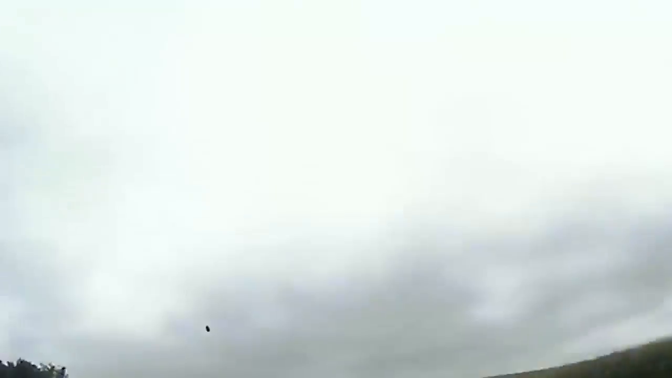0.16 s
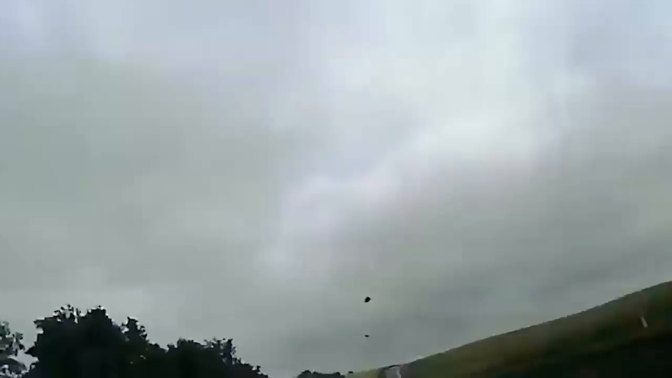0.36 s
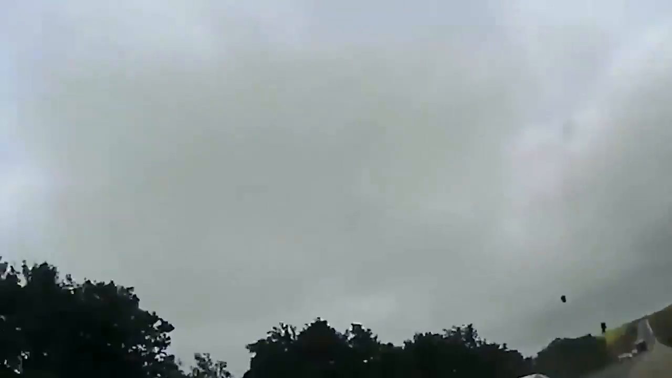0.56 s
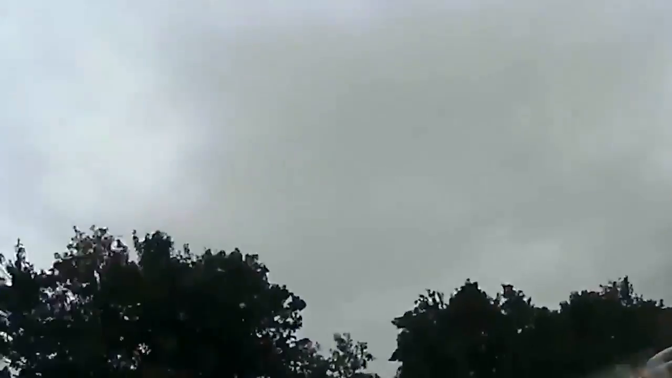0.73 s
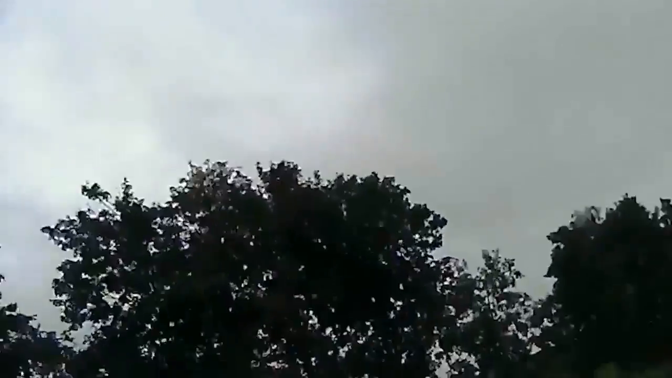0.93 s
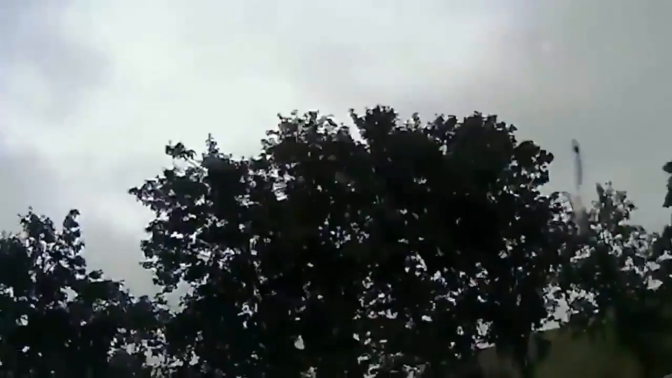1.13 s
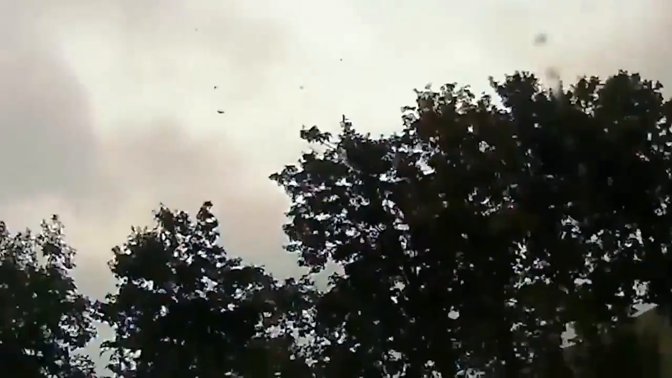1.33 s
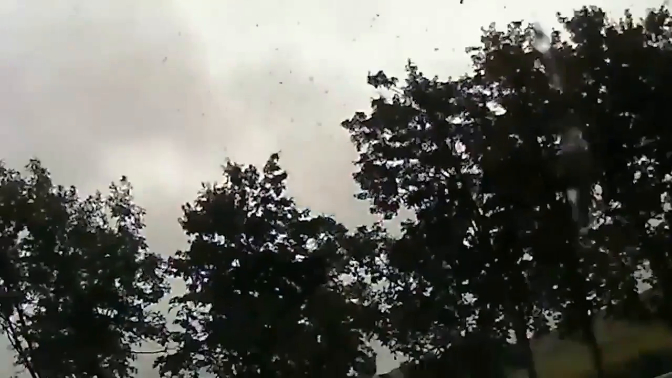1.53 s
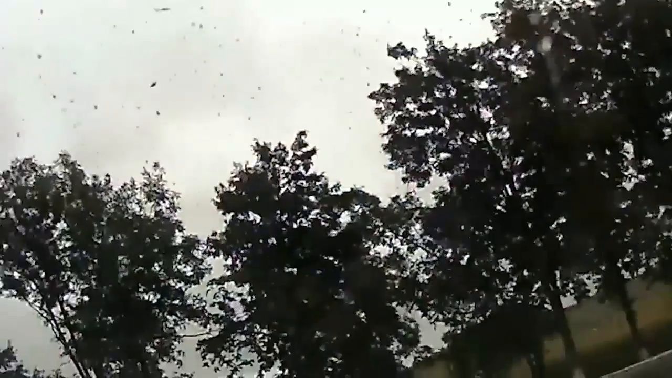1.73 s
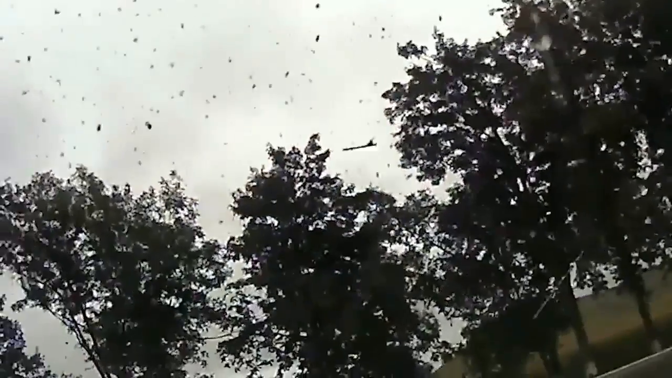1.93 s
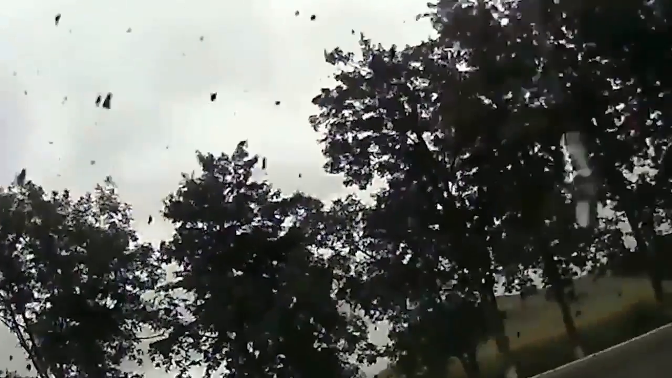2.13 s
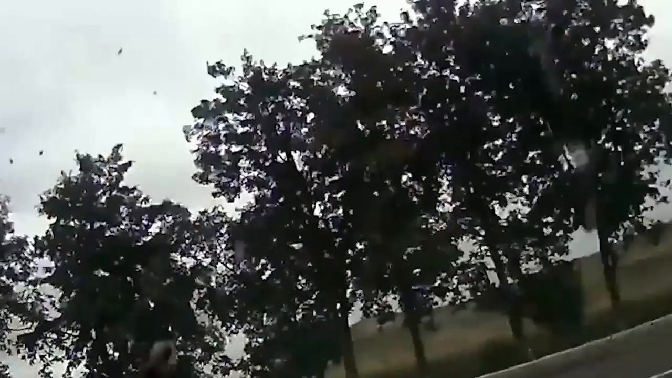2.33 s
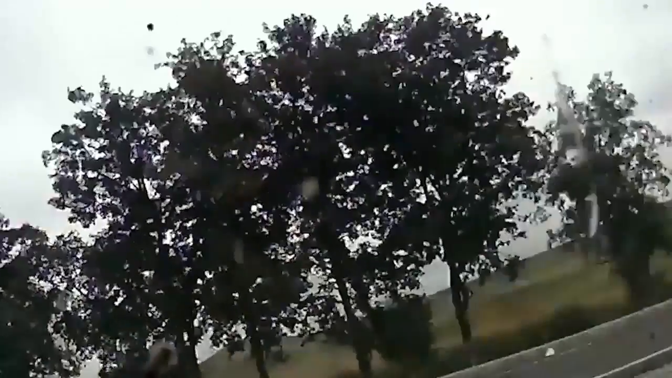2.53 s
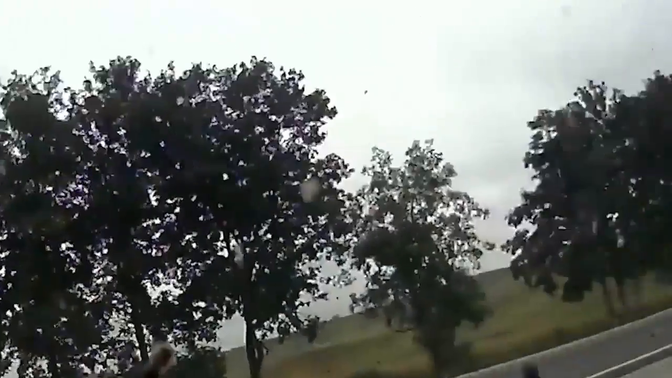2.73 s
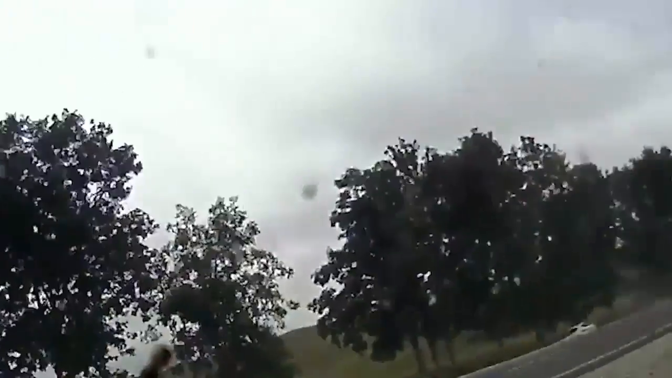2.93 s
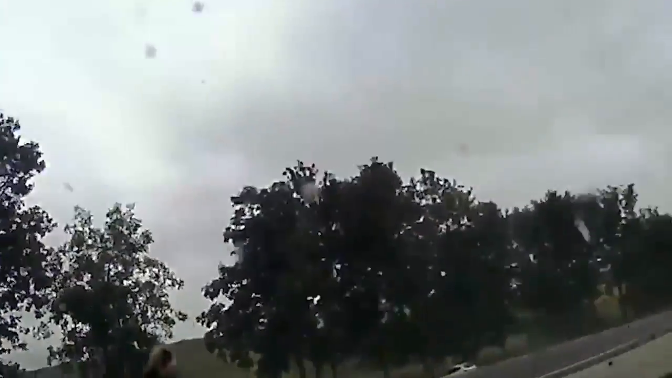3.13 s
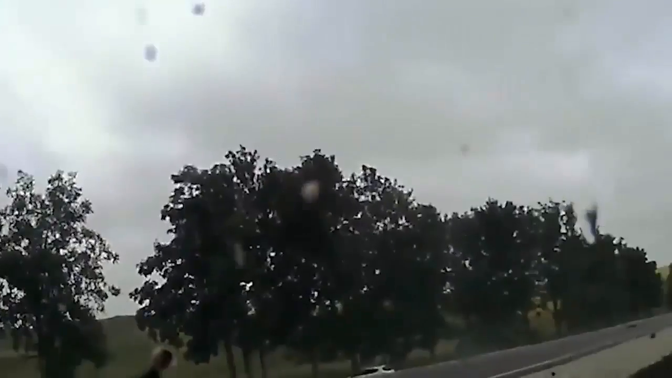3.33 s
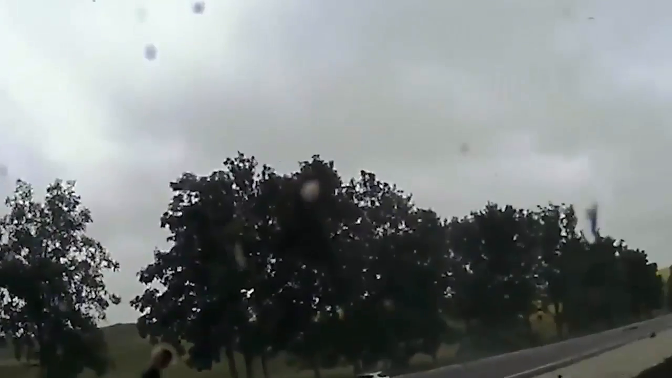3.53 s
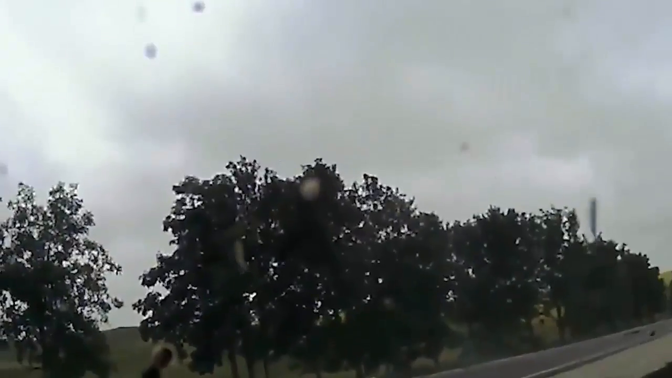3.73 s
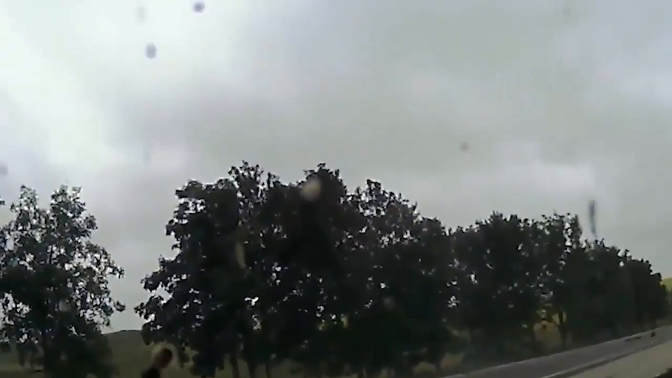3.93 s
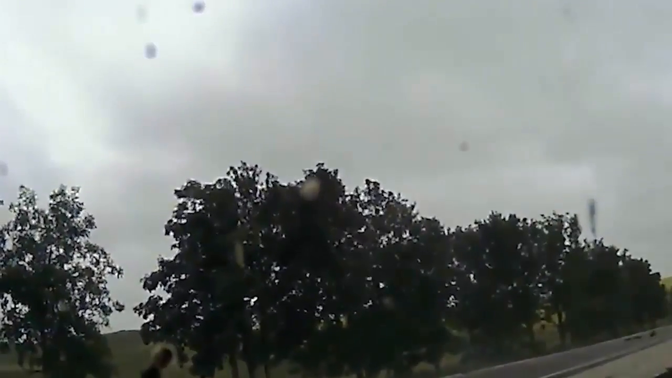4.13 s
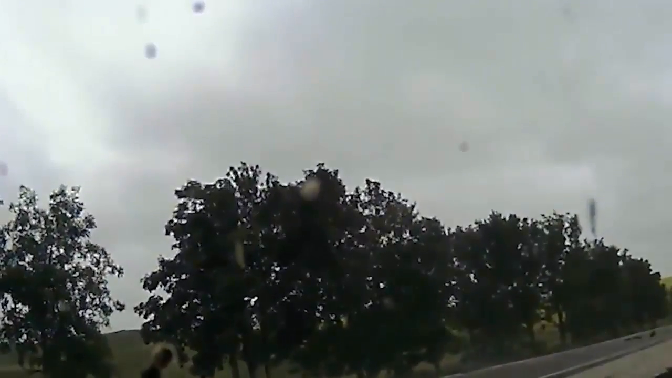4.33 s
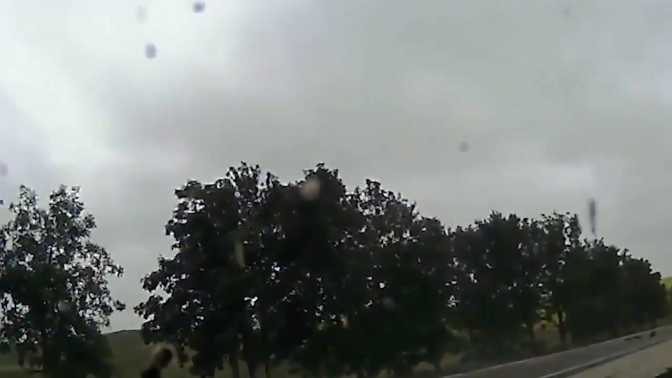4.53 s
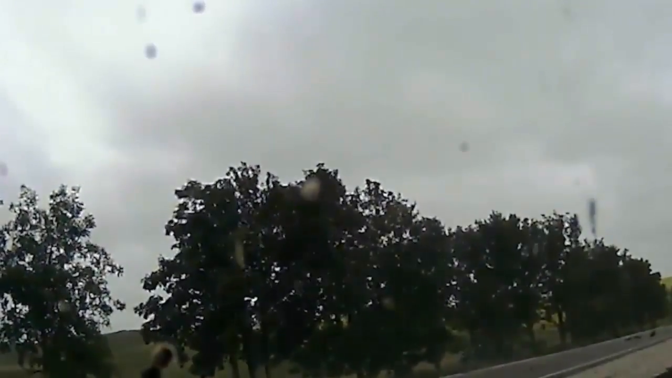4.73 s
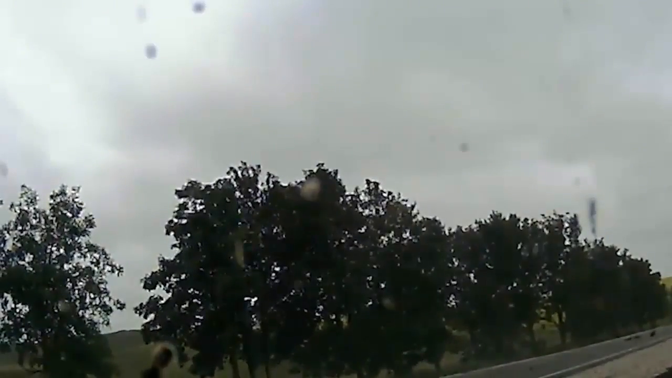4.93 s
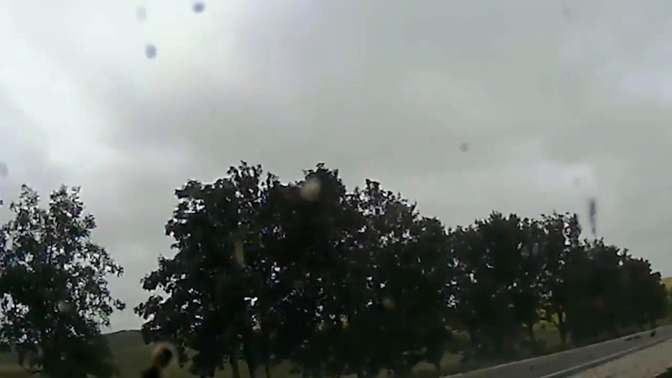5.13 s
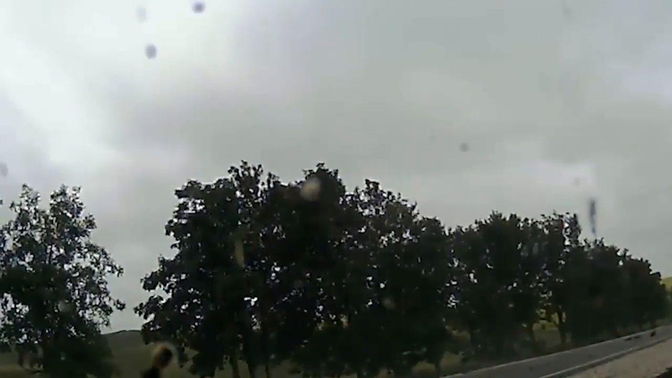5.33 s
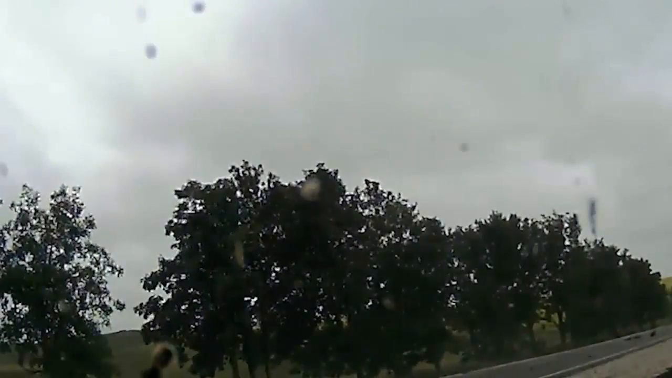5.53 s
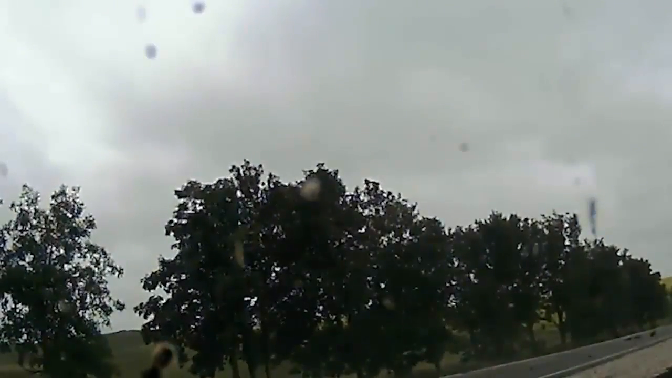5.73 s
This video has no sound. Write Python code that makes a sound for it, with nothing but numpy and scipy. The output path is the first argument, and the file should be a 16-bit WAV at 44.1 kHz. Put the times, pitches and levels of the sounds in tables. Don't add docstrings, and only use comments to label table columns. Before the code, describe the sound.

Heard from a microphone on a car's windscreen: a brief, fuzzy tyre squeal, then a massive impact that distorts the microphone. The shell crunches and scrapes over gravel, plastic snaps, panels bang and stones crack on glass. Over about two seconds it thins into separate knocks and rattles, then near quiet with small taps, faint brake squeaks and a low idling engine.

```python
import sys
import numpy as np
from scipy import signal
from scipy.io import wavfile
from scipy.ndimage import uniform_filter1d

SR = 44100
rng = np.random.default_rng(int(sys.argv[2]) if len(sys.argv) > 2 else 0)


def invert_db(level):
    return 10 ** (np.asarray(level, dtype=float) / 20)


def bounce(signal):
    frames = np.transpose(np.atleast_2d(signal))
    limited = np.clip(frames, -1, 1)
    pcm = np.round(limited * 32767).astype(np.int16)
    wavfile.write(sys.argv[1], SR, pcm)


N = 254721

# f/Hz, level/dB per Hz
FLOOR_SPECTRUM = [(7.1, -33), (12, -1), (38, -1), (70, -5), (128, -6.5), (172, -20), (220, -23), (260, -22),
                  (340, -32), (570, -120)]
PANEL_SPECTRUM = [(71, -33.5), (120, -4.5), (192, -11.5), (492, -11), (944, -17), (1500, -25), (2900, -40),
                  (9900, -73)]
SPLINTER_SPECTRUM = [(880, 8.5), (1500, 5), (1960, -3), (2910, 1), (3510, -6), (4820, -1.5), (11800, -18),
                     (14500, -16), (15200, -39.5), (16000, -46.5)]
FOLDING_SPECTRUM = [(30, -54.5), (100, 8.5), (350, -6.5), (900, -8), (3000, -28.5), (12000, -63)]
SKID_LEVELS = (-31, -38, -61.5)
# t/s, level/dB
VIOLENCE = [(.33, -36), (.49, -22), (.54, -3.5), (.73, -4), (.96, -12.5), (1.25, -15.5), (1.64, -18),
            (1.8, -23.5), (1.93, -23), (2.27, -28), (2.45, -30.5), (2.86, -36.5), (3.27, -41.5),
            (3.71, -35), (4.16, -38.5), (4.56, -43), (5.21, -48), (5.78, -47.5)]
# t/s, length/s, rumble level/dB
RUTS = [(.33, 0.09, -7.5), (.8, 0.24, -10), (1.25, 0.067, -10.5), (1.66, 0.27, -13.5), (2.14, 0.37, -19.5),
        (2.72, 0.24, -26), (3.51, 0.3, -32), (4.1, 0.28, -41), (4.56, 0.085, -40), (5.18, 0.17, -31),
        (5.78, 0.21, -38)]
# t/s, length/s, rattle level/dB
GRAVEL_SHOWERS = [(1.38, 0.22, -31), (2.62, 0.1, -49), (3.585, 0.052, -46.5), (3.75, 0.12, -47.5),
                  (3.86, 0.027, -38.5), (3.98, 0.049, -46), (4.11, 0.072, -43), (4.19, 0.037, -44),
                  (4.27, 0.14, -50), (4.43, 0.05, -45.5), (4.6, 0.017, -45), (4.69, 0.076, -46.5),
                  (5.7, 0.065, -52.5), (5.77, 0.014, -52)]
# t/s, level/dB
OVERDRIVE = [
    (.5, -8.5),
    (1.1, 1.5),
    (1.398, -4.5),
]

# t/s, f/Hz, level/dB
TYRE_SLIP = [
    (0, 1010, -33),
    (.05, 1055, -34),
    (.1, 965, -32),
    (.17, 950, -32),
    (.215, 985, -31),
    (.245, 960, -35),
    (.262, 950, -30),
    (.287, 985, -27),
    (.32, 930, -33),
]
# multiple, level/dB
SLIP_HARMONICS = [(1, 2.5), (2, -11), (3, -19)]
# pitch ratio to the first at start and at end, level/dB, blur/Hz
OTHER_TYRE = (1.17, 1.12, -8, 100)

# t/s, peak level/dB, ring f/Hz, top end level/dB
CHIP_TICKS = [
    (.1545, -35.5, 4000, -36),
    (.7327, -2, 2850, -1.5),
    (.823, -10, 2950, -19),
    (2.4418, -16, 2800, -30),
    (4.2837, -25.5, 2340, -25),
    (4.4478, -32, 5900, -11),
    (5.1706, -38, 4670, -22),
    (5.6514, -26, 2170, -16.5),
    (5.6605, -25, 3220, -19),
]
# t/s, peak level/dB, ring f/Hz, top end level/dB
PLASTIC_BREAKS = [(.4405, 2.5, 3370, -27), (.474, -17, 3360, -17), (.4895, -2, 3400, -12.5),
                  (.539, -24, 3550, -10), (.676, -27.5, 3000, 16), (.765, -18, 4300, -13),
                  (.5945, 0.5, 2540, -2), (1.0904, -20, 2700, -1), (1.1638, -15, 2460, -27),
                  (1.2979, -24, 3340, -24), (1.3094, -17.5, 2540, -9), (1.4087, -13.5, 2650, -14),
                  (1.479, -21, 2680, 3), (1.5794, -14.5, 2650, -8), (1.8003, -23, 2750, -27),
                  (1.8821, -22, 2800, -29), (1.8994, -21, 3020, -23), (1.9495, -26, 2760, -22),
                  (2.0951, -15, 2780, -32), (2.2189, -25, 2830, -28), (2.2613, -24, 2800, -24),
                  (2.3605, -31, 3120, 8), (2.609, -30, 2840, -29), (3.3972, -36, 2770, -25),
                  (3.589, -25.5, 2840, -23), (5.0065, -39.5, 2610, -38)]
# t/s, peak level/dB, ring f/Hz, top end level/dB
STONE_HITS = [(1.063, -11.5, 4200, -41), (1.2216, -21, 5630, -13), (1.2486, -17, 4710, -23),
              (1.3613, -14, 4660, -30), (1.4431, -22, 4020, -24), (1.6621, -8, 4130, -7),
              (2.3126, -17.5, 5160, -4), (2.6863, -32.5, 4340, -10), (2.8652, -18.5, 4860, -8),
              (2.9287, -28, 4670, -19), (2.946, -32, 4540, -23), (2.995, -39, 4520, -21),
              (3.0495, -39.5, 4230, -18), (3.1921, -39, 4000, 23), (3.2869, -35, 5050, -13),
              (3.3044, -41, 4000, 14), (3.5339, -40, 4370, -18), (3.6394, -37.5, 4000, 7),
              (3.7504, -33, 7400, -9), (4.0801, -27.5, 4220, -7), (4.2567, -34, 4000, 2),
              (4.5136, -37, 4370, -26), (4.5979, -33, 5550, 10)]
# t/s, peak level/dB, ring f/Hz, T60/s
FLOOR_BLOWS = [(.255, -20, 78.4, 0.22), (1.59, -28, 61.6, 0.037), (1.95, -14, 72, 0.12),
               (2.474, -36, 60.5, 0.047), (2.669, -34, 61.4, 0.053), (2.799, -21, 61.7, 0.12),
               (3.049, -17.5, 112, 0.093), (3.064, -23.5, 125.3, 0.51), (3.131, -25, 129, 0.091),
               (3.359, -21, 57, 0.14), (3.47, -23, 63, 0.15), (3.592, -48, 75.4, 0.089),
               (3.781, -41, 61.9, 0.087), (4.49, -52, 112.5, 0.084), (5.056, -21.5, 62.7, 0.061),
               (5.077, -20.5, 76.6, 0.17), (5.148, -27, 64.7, 0.061), (5.188, -32, 63.5, 0.14)]
# t/s, peak level/dB, ring f/Hz, upper ring level/dB
PANEL_KNOCKS = [(.3225, -13, 402, -32), (.966, -8, 334, -35), (1.09, -22, 393, 0), (1.253, -6, 365, -35),
                (1.449, -4.5, 378, -7.5), (1.705, -15, 338, -14), (1.899, -18, 320, -10),
                (2.262, -5, 440, -5), (2.385, -19, 300, -4), (2.491, -21, 372, -20), (2.93, -38, 391, 2),
                (3.155, -22.5, 367, -5), (3.218, -10.5, 376, -12), (3.373, -22.5, 271, -34),
                (3.397, -21.5, 394, 0), (3.469, -24.5, 337, -4.5), (3.532, -21, 272, 2.5),
                (3.595, -29, 438, -11), (3.732, -19, 434, -12), (4.256, -23.5, 435, 1.5),
                (4.503, -31, 246.3, 5), (4.586, -35, 445, -14), (4.802, -26.5, 250, -19),
                (5.005, -30, 332, 4.5), (5.17, -26.5, 350, -26), (5.278, -33, 335, -25),
                (5.316, -35, 283, -10)]
# t/s, peak level/dB, ring f/Hz, upper ring level/dB
TRIM_KNOCKS = [(.886, -34, 685, -8), (1.035, -1.5, 520, -34), (1.299, -6, 725, -8), (1.561, -4, 606, 27),
               (1.631, -8.5, 510, -3), (1.776, -20, 594, -1), (1.88, -4, 687, -1), (1.989, -16, 690, -24),
               (2.019, -31, 550, -3), (2.096, -1.5, 840, -0.5), (2.128, -7, 630, -1.5),
               (2.145, -13, 725, -12), (2.213, -3.5, 697, -12), (2.226, -5, 480, -6),
               (2.236, -10.5, 607, -10), (2.291, -7.5, 720, -39), (2.41, -14.5, 694, -10),
               (2.77, -27, 503, -28), (2.802, -18.5, 710, -16), (3.214, -13.5, 1030, 0),
               (3.849, -24, 524, -1), (4.079, -26, 624, -5), (4.645, -25.5, 705, -1.5),
               (5.651, -17, 640, -5), (5.661, -27, 1600, -3)]
# t/s, peak level/dB, ring f/Hz, upper ring level/dB
TRIM_TAPS = [(0.569, 5, 740, -12), (0.62, 1, 495, -2), (0.72, -11, 493, -2), (0.867, -6.5, 855, -1),
             (0.949, -13, 740, -6), (0.98, -4, 503, -18), (1.109, -14, 480, -7), (1.138, -16, 690, -9),
             (1.223, -28.5, 754, -9), (1.276, -18, 690, 10), (1.355, -25, 536, 4), (1.431, -8, 493, -5),
             (1.509, -19, 567, -3), (1.597, -4, 724, -15), (1.647, -12, 725, -21), (1.666, -16, 730, -19),
             (1.739, -21, 730, -4), (1.848, -18, 525, -8), (1.928, -18, 697, 0), (2.122, -4, 700, -12),
             (2.361, -25, 608, 4), (3.206, -21.5, 920, -24), (3.224, -19, 530, -22), (3.696, -38, 560, -24),
             (3.721, -41, 530, -12), (3.771, -27, 657, 0), (3.816, -31, 556, -3), (3.885, -26, 530, -19),
             (3.955, -29.5, 970, -18), (4.062, -28, 754, -12), (4.09, -28, 638, -8), (4.172, -40, 980, -6),
             (4.31, -34, 846, -17), (4.355, -30.5, 963, -13), (4.398, -37, 1000, -6), (4.6, -33, 1320, -14),
             (4.624, -36, 1250, -13)]

# t/s, cabin pressure/full scale, crushing force/full scale
CABIN_PRESSURE = [
    (.325, 0, 0),
    (.329, -.3, .2),
    (.334, -1.5, .5),
    (.44, -1.1, .5),
    (.452, -1.7, .3),
    (.47, -1.1, .3),
    (.497, -.4, .25),
    (.504, -.05, .2),
    (.535, 0, .12),
    (.58, 0, 0),
]
# t/s, length/ms
SEAM_POPS = [(.3302, 2.1), (.3328, .9), (.3401, 2.9), (.3438, .2), (.3518, .5), (.3531, .3), (.3551, .2),
             (.3602, 1.4), (.3678, 2.6), (.3739, .6), (.375, .4), (.3763, 1.7), (.3793, .3), (.3804, .6),
             (.3818, .3), (.3832, 1.2), (.3888, .2), (.3937, 2.6), (.3991, .5), (.403, 1), (.4077, .3),
             (.411, 1.9), (.4141, .4), (.4162, .5), (.4183, 1.4), (.4223, .8), (.4246, 1.2), (.4266, .3),
             (.4279, 1), (.434, 1.6), (.4387, 6.9), (.4464, .8), (.4498, .9), (.4581, .3), (.4655, 1.2),
             (.474, .4), (.4758, .4), (.481, 12), (.4936, 2.1), (.5012, 4), (.5279, 4.3), (.533, 2.8)]
# t/s, peak level/dB, f/Hz
BODY_ROCKS = [(0.467, -32, 43.7), (0.698, -12, 36.3), (.8, -11.5, 34), (0.931, -14, 31), (1.1, -37, 33.7),
              (1.302, -13.5, 36), (1.48, -9, 32.3), (1.602, -14, 39), (1.799, -19, 47), (2.2, -41, 40),
              (2.418, -18.5, 45), (2.619, -22, 30.7), (3.02, -24.5, 47.3), (3.16, -26.5, 37)]
# t/s, length/s, f/Hz, level/dB
SPLINTER_STROKES = [(0.565, 0.042, 2860, -19.5), (0.626, 0.027, 2600, -20), (.76, 0.036, 2600, -23.5),
                    (.89, 0.048, 2410, -31.5), (1.004, 0.035, 2530, -34), (2.185, 0.026, 1760, -39),
                    (2.305, 0.023, 900, -29.5), (3.58, .025, 3070, -42), (3.66, 0.045, 2200, -53),
                    (3.78, 0.044, 2280, -49), (3.955, .04, 2400, -51), (4.1, 0.033, 4160, -47),
                    (4.194, 0.018, 4000, -49), (4.43, .02, 2490, -48), (5.694, 0.028, 4100, -46),
                    (5.766, 0.022, 3900, -54)]
# t/s, f/Hz, level/dB
TYRE_DRAG = [
    (.98, 97.85, -44),
    (1.025, 111.3, -15),
    (1.06, 130.4, -13.5),
    (1.1, 134.2, -27),
    (1.13, 159, -12.5),
    (1.18, 141.7, -25),
    (1.25, 134.3, -24),
    (1.32, 114, -20.5),
    (1.4, 109, -41),
]
# t/s, length/s, f/Hz, level/dB
PAD_SQUEAKS = [
    (2.63, .11, 14500, -68),
    (2.82, .035, 9000, -65),
    (3.36, .1, 2300, -56),
    (3.87, .09, 2200, -58),
    (4.67, .05, 2300, -60),
    (5.52, .04, 2850, -66),
    (3.41, .07, 11200, -70),
    (3.42, .045, 14500, -70),
]
# t/s, f/Hz, level/dB
ENGINE_FIRING = [
    (3.6, 28.57, -72),
    (3.8, 28.97, -38.5),
    (3.97, 29.67, -43.5),
    (4.29, 31.3, -36),
    (4.8, 31, -38),
    (5.08, 29.97, -40.5),
    (5.39, 27.85, -38),
    (5.55, 30.06, -34.5),
    (5.78, 30.1, -42),
]
# multiple, level/dB
FIRING_HARMONICS = [(1, 4), (2, -2), (3, -2), (4, -15)]
# f/Hz, width/Hz, level/dB
ACCESSORY_WHINE = [(4030, 25, -74), (4400, 900, -74), (940, 40, -71), (8860, 60, -88)]


def curve(rows):
    s, *columns = np.transpose(rows)
    return [np.interp(np.arange(N) / SR, s, c) for c in columns]


def during(rows, fade=0.021):
    start, end = rows[0][0], rows[-1][0]
    return np.interp(np.arange(N) / SR, [start - fade, start, end, end + fade], [0, 1, 1, 0])


def evened(x):
    return x / np.sqrt(np.mean(x ** 2) + 1e-20)


def coloured(x, points):
    f, db = np.transpose(points)
    hz = np.abs(np.fft.fftfreq(2 ** 14, 1 / SR))
    level_db = np.interp(np.log(hz + 1), np.log(f + 1), db, left=-70, right=-70)
    log_gain = np.log(invert_db(level_db))
    taps = np.fft.ifft(np.exp(np.conj(signal.hilbert(log_gain)))).real[:2 ** 13]
    return evened(signal.oaconvolve(x, taps)[:len(x)])


def resonate(x, hz, width):
    turn = np.exp(2j * np.pi * np.cumsum(hz * np.ones(len(x))) / SR)
    r = np.exp(-np.pi * width / SR)
    return 2 * (turn * signal.lfilter([1 - r], [1, -r], x / turn)).real


def ring(burst, hz, width):
    return evened(resonate(resonate(burst, hz, width), hz, 3 * width))


def grit(per_s, spread_db, tail_s):
    contact = rng.random(N) < per_s / SR
    size = invert_db(spread_db * np.minimum(rng.exponential(1, N), 4)) * contact
    power = signal.lfilter([1], [1, -np.exp(-1 / (tail_s * SR))], size ** 2)
    return np.sqrt(power + 0.83 * power.mean()) * rng.standard_normal(N)


def pieces(lo_hz, hi_hz, sharpness, per_s, tail_s, count):
    pitches = np.geomspace(lo_hz, hi_hz, count) * rng.uniform(0.782, 1.092, count)
    return evened(sum(np.sqrt(f) * ring(grit(per_s, 6.6, tail_s), f, f / sharpness) for f in pitches))


def swells(rows):
    t = np.arange(N) / SR
    return sum(invert_db(2 * db) * np.exp(-((t - s) / length) ** 2 * 2) for s, length, db in rows)


def strike(rows, shape, rise_s, blow):
    out, t = np.zeros(N + 8192), np.arange(8192) / SR
    for (s, db, *colour, t60), noise in zip(rows, rng.standard_normal((len(rows), 8192))):
        envelope = (1 - np.exp(-t / rise_s)) * invert_db(-60 * t / t60)
        burst = shape(noise * envelope + blow * signal.unit_impulse(8192, 4), *colour)
        out[round(s * SR):][:8192] += invert_db(db) * burst / np.abs(burst).max()
    return out[:N]


def ringing(rows, t60_s, *upper_hz):
    return [(s, db, hz, *upper_hz, upper_db, t60_s) for s, db, hz, upper_db in rows]


def slide():
    violence_db, = curve(VIOLENCE)
    touched = np.arange(N) / SR > .326
    rumble_gain = np.sqrt(invert_db(2 * (violence_db - 1)) + swells(RUTS))
    rattle_gain = np.sqrt(invert_db(2 * (0.82 * violence_db - 22)) + swells(GRAVEL_SHOWERS))
    skid_gains = invert_db(np.array(SKID_LEVELS))[:, None]
    gains = np.where(touched, [rumble_gain, invert_db(violence_db), rattle_gain], skid_gains)
    rumble = coloured(grit(per_s=150, spread_db=.7, tail_s=.015), FLOOR_SPECTRUM)
    panels = pieces(199, 2870, sharpness=4.15, per_s=30, tail_s=0.0087, count=9)
    folds = evened(grit(per_s=140, spread_db=5.0, tail_s=0.0096))
    crunch = coloured(folds + invert_db(-7.5) * panels, PANEL_SPECTRUM)
    splinters = pieces(2300, 9700, sharpness=4.0, per_s=25, tail_s=0.001, count=8)
    gravel = evened(grit(per_s=440, spread_db=-0.5, tail_s=0.00091))
    rattle = coloured(gravel + invert_db(-6.0) * splinters, SPLINTER_SPECTRUM)
    return (gains * [rumble, crunch, rattle]).sum(axis=0)


def squeal():
    hz, db = curve(TYRE_SLIP)
    out = np.zeros(N)
    for first, last, tyre_db, blur in [(1, 1, 0, 55), OTHER_TYRE]:
        factor, = curve([(TYRE_SLIP[0][0], first), (TYRE_SLIP[-1][0], last)])
        slips, waver = rng.standard_normal((2, N))
        waver = evened(uniform_filter1d(uniform_filter1d(waver, size=500), size=500))
        slip_hz = factor * hz * (1 + .014 * waver)
        turns = np.cumsum(slip_hz) / SR
        for k, harmonic_db in SLIP_HARMONICS:
            random_slips = ring(slips, k * slip_hz, blur * k)
            regular_slips = invert_db(tyre_db) * np.cos(2 * np.pi * k * turns)
            out += invert_db(tyre_db + harmonic_db) * (random_slips + regular_slips)
    return invert_db(db - 7.5) * out * during(TYRE_SLIP, fade=.005)


def crack(burst, hz, top_db):
    broad = evened(resonate(ring(burst, 1.02 * hz, 3500), 1.26 * hz, 4900))
    snap = invert_db(-4.5) * ring(burst, hz, 270) + broad
    top = evened(resonate(resonate(burst, 9600, 7300), 6500, 9900))
    return snap + invert_db(top_db) * top


def thud(burst, hz):
    return resonate(resonate(burst, hz, .5 * hz), hz, 2 * hz)


def knock(burst, low_hz, high_hz, high_db):
    front = burst * invert_db(-506 * np.arange(len(burst)) / SR)
    modes = ring(burst, low_hz, 128) + invert_db(high_db) * ring(front, high_hz, 265)
    tap = invert_db(high_db - 5.0) * ring(front, 1345, 405)
    boom = invert_db(-4.5) * ring(burst, 324, 182)
    return signal.lfilter(*signal.butter(2, 2600, fs=SR), modes + tap + boom)


def collision():
    pressure, force = curve(CABIN_PRESSURE)
    popping = np.zeros(N)
    for s, length_ms in SEAM_POPS:
        popping[round(s * SR):round((s + length_ms / 1000) * SR)] = 1
    popping = uniform_filter1d(popping, size=11)
    folding = coloured(grit(per_s=250, spread_db=2.5, tail_s=.006), FOLDING_SPECTRUM)
    tearing = ring(grit(per_s=500, spread_db=3, tail_s=.001), 2600, 3000)
    pop_pressure = .85
    return (1 - popping) * pressure + popping * pop_pressure + force * (folding + invert_db(-11) * tearing)


def shudder():
    out, t = np.zeros(N + SR), np.arange(SR) / SR
    rise_s, t60_s = 0.051, 0.6
    for s, db, hz in BODY_ROCKS:
        swing = (1 - np.exp(-t / rise_s)) * invert_db(db - 60 * t / t60_s) * np.sin(2 * np.pi * hz * t)
        out[round(s * SR):][:SR] += np.sqrt(2) * swing
    return out[:N]


def scrapes():
    rough = evened(grit(per_s=600, spread_db=2.5, tail_s=.0015))
    out = np.zeros(N)
    for s, length, hz, db in SPLINTER_STROKES:
        near = slice(round((s - 2 * length) * SR), round((s + 2 * length) * SR))
        out[near] += np.sqrt(swells([(s, length, db)])[near]) * ring(rough[near], hz, 0.45 * hz)
    return out


def groan():
    hz, db = curve(TYRE_DRAG)
    tone = np.sqrt(2) * np.cos(2 * np.pi * np.cumsum(hz) / SR)
    roughness = invert_db(-1.5) * ring(rng.standard_normal(N), hz, 23)
    return invert_db(db) * (tone + roughness) * during(TYRE_DRAG)


def squeaks():
    out = np.zeros(N)
    for s, length, hz, db in PAD_SQUEAKS:
        size = round(length * SR)
        tone = ring(rng.standard_normal(8192), hz, 45)[-size:]
        out[round(s * SR):][:size] += invert_db(db) * tone * signal.windows.tukey(size, .5)
    return out


def idle():
    hz, db = curve(ENGINE_FIRING)
    phase = 2 * np.pi * np.cumsum(hz) / SR
    uneven_db = 2.3 * evened(uniform_filter1d(rng.standard_normal(N), size=1500))
    firing = sum(invert_db(d) * np.cos(k * phase - .15 * k ** 2) for k, d in FIRING_HARMONICS)
    whine = sum(invert_db(d) * evened(resonate(rng.standard_normal(N), f, w)) for f, w, d in ACCESSORY_WHINE)
    return (whine - invert_db(db + uneven_db) * evened(firing)) * during(ENGINE_FIRING, fade=0.3)


def scene():
    knocks = ringing(PANEL_KNOCKS, 0.12, 900) + ringing(TRIM_KNOCKS, .065, 1000)
    knocks += ringing(TRIM_TAPS, 0.064, 1517)
    cracks = ringing(PLASTIC_BREAKS, .045) + ringing(STONE_HITS, .04) + ringing(CHIP_TICKS, .023)
    hits = strike(FLOOR_BLOWS, thud, rise_s=.002, blow=9)
    hits += strike(knocks, knock, rise_s=.001, blow=5)
    hits += strike(cracks, crack, rise_s=0.0016, blow=1.6)
    overload_db, = curve([(0, 0.0067), (.32, 0.035)] + OVERDRIVE)
    driven = invert_db(overload_db) * (slide() + groan() + hits + scrapes())
    return (collision() + driven + shudder() + squeal() + squeaks() + idle())[None]


def top_cut(x):
    return signal.sosfilt(signal.butter(12, 15840, fs=SR, output="sos"), x)


def record(dry):
    travel = np.where(dry < 0, .49, .57)
    capsule = dry / (1 + np.abs(dry / travel) ** 4) ** (1 / 4)
    coupled = signal.lfilter([1, -1], [1, -np.exp(-1 / (.022 * SR))], capsule + .022 * dry)
    clipped = coupled / (1 + np.abs(coupled / .43) ** 12) ** (1 / 12)
    mount_buzz = np.tanh(signal.lfilter([1, -1], [1, -.8], dry) * 2)
    lowpass = signal.firwin(61, 15000, fs=SR)[None]
    limited = signal.oaconvolve(clipped + .045 * mount_buzz, lowpass, "same")
    return top_cut(limited)


dry = scene()
out = record(dry)
bounce(out)
```